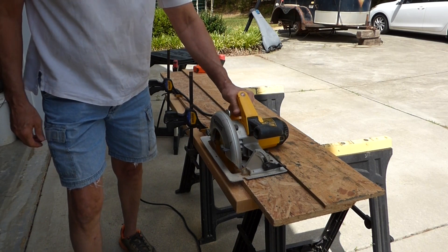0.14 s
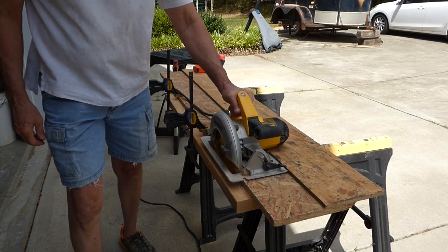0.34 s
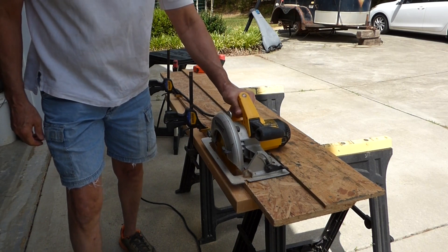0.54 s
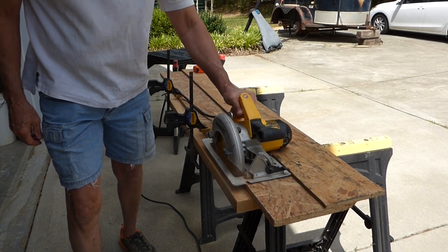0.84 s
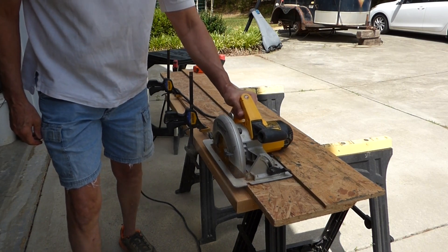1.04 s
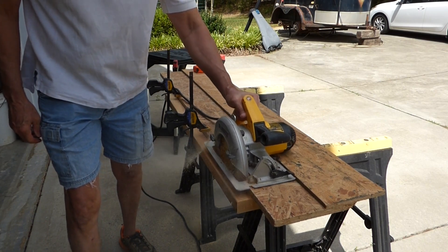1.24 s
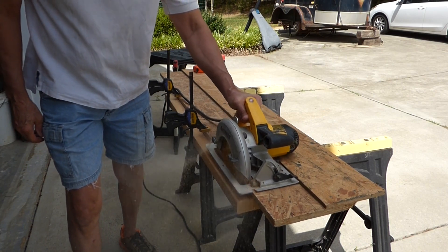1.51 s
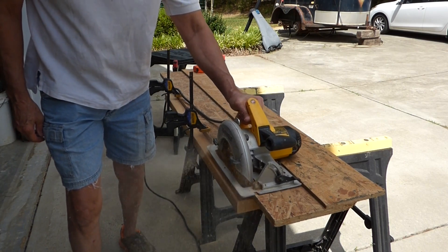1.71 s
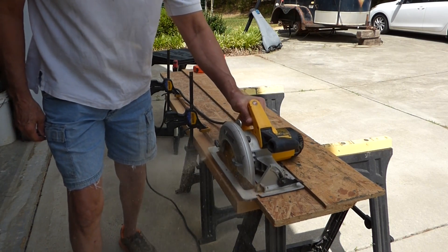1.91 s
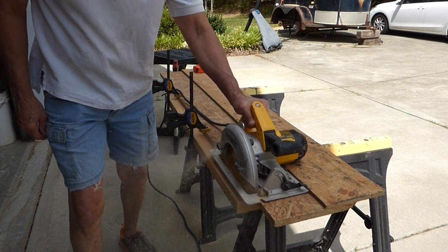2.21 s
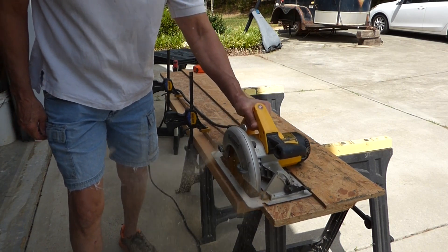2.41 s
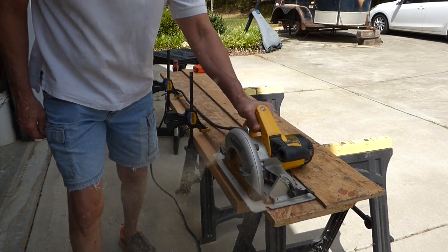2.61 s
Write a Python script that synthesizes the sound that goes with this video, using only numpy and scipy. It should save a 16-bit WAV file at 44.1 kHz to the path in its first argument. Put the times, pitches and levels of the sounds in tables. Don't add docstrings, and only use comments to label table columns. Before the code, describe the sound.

Circular saw kicks on with a sharp, dense clatter that dies quickly, then runs much quieter and steadily, gritty and hissing, its blade singing faintly in the wood; slight garage echo, quiet yard behind, near microphone.

```python
import sys
import numpy as np
from scipy import signal
from scipy.fft import rfft, irfft
from scipy.io import wavfile
from scipy.ndimage import uniform_filter1d

SR = 44100
rng = np.random.default_rng(int(sys.argv[2]) if len(sys.argv) > 2 else 0)


def rack_gain(trim_db):
    fader = np.asarray(trim_db, float)
    return 10 ** (fader / 20)


def store_pcm(level_fs):
    pcm = np.round(np.clip(level_fs, -1, 1) * 32767).astype(np.int16)
    wavfile.write(sys.argv[1], SR, np.atleast_2d(pcm).T)


N = 121275
TIME = np.arange(N) / SR
SWITCH_S, SPIN_UP_S = 0.1115, 0.009
MAINS_HUM_HZ = 120
AIR_TOP_DB = -20.3


def unit_level(x):
    return x / np.sqrt(np.mean(x ** 2) + 1e-20)


def read_curve(points, hz):
    f, value = np.transpose(points)
    return np.interp(np.log(hz + 1), np.log(f + 1), value)


def drift(seconds, count):
    span = max(int(seconds * SR / 64), 2)
    steps = rng.standard_normal((count, N // 64 + 2))
    steps = uniform_filter1d(uniform_filter1d(steps, span), span)
    return np.array([np.interp(np.arange(N) / 64, np.arange(len(s)), unit_level(s)) for s in steps])


def ring(x, modes, wander_db):
    out = np.zeros(N)
    sway = rack_gain(wander_db * drift(0.059, count=len(modes)))
    for k, (hz, width, db) in enumerate(modes):
        b, a = signal.iirpeak(hz, hz / width, SR)
        out += (-1) ** k * rack_gain(db) * signal.lfilter(b, a, x * sway[k])
    return out


def wash(shape, patch_db, flicker_db, likeness):
    frames, hz = N // 128 + 5, np.fft.rfftfreq(512, 1 / SR)
    a, b, c, d, patches = rng.standard_normal((frames, 257, 5)).T
    patches = uniform_filter1d(uniform_filter1d(patches, size=6, axis=0), size=18, axis=1)
    flicker = unit_level(uniform_filter1d(rng.standard_normal(frames), size=5))
    same = np.clip(likeness(hz), -1, 1)[:, None]
    left = a + 1j * b
    right = same * left + np.sqrt(1 - same ** 2) * (c + 1j * d)
    level_db = read_curve(shape, hz)[:, None] + patch_db * unit_level(patches) + flicker_db * flicker
    spectra = np.array([left, right]) * rack_gain(level_db)
    return unit_level(signal.istft(spectra, nperseg=512, noverlap=384)[1][:, :N])


# (time [s], housing shake [dB], air rush [dB], tooth bite [dB])
RUNNING = [(0.128, -18, -32, -37), (0.159, -31, -14, -27), (0.17, -28, -20, -26.5), (0.33, -35, -21, -33),
           (0.43, -31.5, -21.5, -27.5), (0.46, -34.5, -21.5, -33), (0.63, -31.5, -10, -29.5),
           (0.7, -34, -20, -37), (0.76, -34.5, -19.5, -30), (1.23, -36, -8, -33), (1.35, -32, -20.5, -27),
           (1.41, -31.5, -22.5, -33), (1.49, -35.5, -18.5, -31), (1.71, -32, -21, -30.5),
           (2.02, -38, -21.5, -32), (2.04, -35, -21, -32), (2.49, -37.5, -21, -35),
           (2.75, -36.5, -21.5, -28.5)]


def running_db(column):
    rows = np.array(RUNNING)
    return np.interp(TIME, rows[:, 0], rows[:, column])


def switched_on():
    return np.clip((TIME - SWITCH_S) / SPIN_UP_S, 0, 1) ** 2


def chatter():
    spread_db = 1.5 * np.minimum(rng.exponential(1, N), 4)
    size = rack_gain(spread_db) * rng.choice([-1., 1.], N)
    ripple = 1 + 0.22 * np.sin(2 * np.pi * MAINS_HUM_HZ * TIME)
    hits = rng.random(N) < 2500 / SR
    return unit_level(ripple * size * hits)


# (frequency [Hz], width [Hz], level [dB])
BODY_MODES = [(231, 18, -21), (369, 22, -13.5), (490, 25, -9), (656, 63, -16.5), (823.4, 35.4, -4.5),
              (968, 39, -3), (1057, 40, -4), (1170, 47, -3), (1253, 38, -2), (1436, 73, -8),
              (1545, 48, -0.5), (1900, 420, -9)]
# (frequency [Hz], width [Hz], level [dB])
KERF_MODES = [(2090, 45, -5.5), (2300, 55, 0), (2380, 70, -2), (2462, 55, .5), (2540, 45, 0),
              (2650, 150, -8), (2870, 18, -6)]
# (frequency [Hz], width [Hz], level [dB])
BLADE_MODES = [(3080, 18, -5), (4073, 83, -4), (4690, 184, -3.5), (5246, 150, -3.5), (5975, 74, -1),
               (7930, 580, -1.5), (8860, 170, 1), (9740, 420, -6), (10530, 90, -11), (10300, 71, 1),
               (12200, 1700, -7), (13340, 310, -6.5)]
# (frequency [Hz], width [Hz], level [dB])
PLATE_MODES = [(3185, 14, -2), (3307, 16, 0), (3470, 14, -1), (3640, 16, 1), (3852, 16, 0), (4143, 30, 1),
               (4851, 30, 3), (1394, 14, -1)]


def gears():
    since = TIME - SWITCH_S
    spun = 1 - np.exp(-np.clip(since, 0, 9) / 0.0084)
    judder_db = 4 * np.exp(-(since / 0.11 - 1) ** 2)
    blade_db = np.minimum(running_db(column=2), AIR_TOP_DB) - 5
    body = unit_level(ring(chatter(), BODY_MODES, 1.5)) * rack_gain(running_db(column=1) + judder_db)
    kerf = unit_level(ring(chatter(), KERF_MODES, 0.57)) * rack_gain(running_db(column=3) - 2.0)
    blade = unit_level(ring(chatter(), BLADE_MODES, 1.06)) * rack_gain(blade_db) * spun
    plate = unit_level(ring(chatter(), PLATE_MODES, 1.5)) * rack_gain(-40.5)
    return switched_on() * (body + kerf + blade + plate)


# (time [s], level [dB], brightness [0-1])
KNOCKS = [(.1132, -18, .9), (.1146, -11, .7), (.1156, -7, .65), (.1164, -7, .55), (.1177, -3, .5),
          (.1186, -4, .5), (.1198, -6, .45), (.1220, -7, .25), (.1243, -4, .15), (.1263, -8, .6),
          (.1280, -8, .45), (.1320, -5, .3), (.1340, -6, .35), (.1358, -7, .3), (.1390, -10, .35),
          (.1415, -7, .35), (.1430, -9, .35), (.1470, -14, .4), (.1526, -10, .4), (.1548, -11, .3),
          (.1660, -13, .3), (.1780, -13, .3), (.197, -13, .25), (.2150, -14, .2)]
# (frequency [Hz], width [Hz], level [dB])
KNOCKED_MODES = [(130, 91, -27), (237, 21, -7), (525, 135, -4.5), (833, 49, -0.5), (1060, 48, 0.5),
                 (1330, 290, -31), (1537, 210, -3), (1780, 240, 0), (2187, 120, 2.5), (3030, 600, 3)]
# (frequency [Hz], width [Hz], level [dB])
CRACKED_MODES = [(3100, 800, -1), (4400, 1200, 0), (6000, 1100, -1.5), (8600, 2200, -2), (11500, 2500, -6)]


def knocks():
    grit = rng.standard_normal(N)
    dull, bright = np.zeros(N), np.zeros(N)
    for start, db, brightness in KNOCKS:
        since = np.clip(TIME - start, 0, 1)
        u, v = since / 0.00052, since / 0.000099
        scrape = u * np.exp(1 - u) * grit
        snap = 1.17 * v * np.exp(1 - v)
        blow = rack_gain(db) * (scrape + snap)
        dull += (1 - brightness) * blow
        bright += brightness * blow
    thud = rack_gain(3.5) * ring(dull, KNOCKED_MODES, 0)
    crack = rack_gain(3.5) * ring(bright, CRACKED_MODES, 0)
    return thud + crack


# (frequency [Hz], level [dB per Hz])
RUSH_COLOUR = [(180, -60), (300, -27), (478, -9), (713, -23.5), (2360, -12), (3130, -15.5), (6620, -8),
               (9710, 3), (16000, -17)]
# (frequency [Hz], likeness [0-1])
RUSH_LIKENESS = [(100, .93), (500, .88), (2000, .92), (4000, .84), (8000, .95), (11000, .97), (15000, .76)]


def air():
    rush = wash(RUSH_COLOUR, 1, 0.96, lambda hz: read_curve(RUSH_LIKENESS, hz))
    rush_db = np.minimum(running_db(column=2), AIR_TOP_DB) - 0.5
    return switched_on() * rack_gain(rush_db) * rush


# (start [s], length [s], frequency [Hz])
SINGS = [(1.64, .16, 1243), (2.35, .42, 1295), (1.24, .16, 960), (2.64, .14, 2310), (1.1, .12, 1400),
         (.33, .13, 832), (.24, .09, 1550), (.95, .2, 3080), (1.1, .25, 2090), (1.5, .2, 6060),
         (1.75, .15, 1550), (.36, .09, 2470), (.86, .1, 2330), (.11, .15, 836), (.53, .12, 834),
         (.122, .07, 1040), (.122, .035, 1560), (.195, .035, 1865), (.25, .035, 2400), (.57, .09, 2520),
         (1.5, .14, 2540), (1.43, .1, 2320), (.8, .3, 965), (1.5, .5, 500), (2.3, .2, 2295),
         (.7, .25, 2460)]
SINGS_DB = [-33, -40, -38, -35, -39, -36, -34, -43, -43, -42, -41, -35, -36, -32.5, -41, -26, -24, -30, -31,
            -36, -40, -38, -45, -50, -42, -40]


def singing():
    out = np.zeros(N)
    waver = drift(0.016, count=len(SINGS))
    for (start, length, hz), db, w in zip(SINGS, SINGS_DB, waver):
        swell = np.sin(np.pi * np.clip((TIME - start) / length, 0, 1))
        phase = 2 * np.pi * np.cumsum(hz + 5.7 * w) / SR
        out += rack_gain(db + 1) * swell * np.sin(phase)
    return out


# (multiple of the hum [count], level [dB])
HUM_OVERTONES = [(1, -2.5), (2, -8.5), (3, -3.5)]
# (time [s], level [dB])
LOAD = [
    (0, -65),
    (.3, -68),
    (.6, -73),
    (1.17, -73),
    (1.3, -63),
    (1.47, -59),
    (1.7, -68),
    (2.2, -70),
    (2.7, -66.5),
]


def windings():
    sway = rack_gain(1.2 * drift(0.034, count=len(HUM_OVERTONES)))
    hum = np.zeros(N)
    for (multiple, db), g in zip(HUM_OVERTONES, sway):
        hum += rack_gain(db) * g * np.sin(2 * np.pi * multiple * (MAINS_HUM_HZ * TIME + 0.03))
    load_db = np.interp(TIME, *np.transpose(LOAD))
    return rack_gain(6.5 + load_db) * hum


# (frequency [Hz], time to fall by 60 dB [s])
GARAGE_RING = [(300, 0.076), (1000, 0.86), (3000, 0.32), (10000, 0.022)]


def garage(x):
    taps = np.zeros((2, SR // 2))
    at = np.arange(300, SR // 2 - 20, 20) + rng.integers(0, 20, (2, (SR // 2 - 301) // 20))
    np.put_along_axis(taps, at, rng.choice([-1., 1.], at.shape), 1)
    hz, t, z = signal.stft(taps, SR, nperseg=256)
    fade = rack_gain(-60 * t / read_curve(GARAGE_RING, hz)[:, None])
    tail = signal.istft(z * fade, SR, nperseg=256)[1]
    return signal.fftconvolve(x[None], tail / np.linalg.norm(tail[0]), axes=1)[:, :N]


# (frequency [Hz], level [dB per Hz])
YARD_COLOUR = [(15, -34), (60, -27), (119, -7.5), (286, -11.5), (382, -12.5), (1160, -10), (6670, -20.5),
               (12000, -28.5), (16000, -44)]


def yard():
    return rack_gain(-51.5) * wash(YARD_COLOUR, 0.56, 0.28, lambda hz: 0.67 + 0 * hz)


# (frequency [Hz], left minus right [dB])
LEAN = [(60, -.5), (150, -1.4), (300, -1.2), (500, .9), (1000, .4), (2000, 1.2), (4000, .9), (8000, 1.1),
        (15000, 1.7)]


def scene():
    saw = gears() + knocks() + windings() + singing()
    both = saw + air() + rack_gain(-17.5) * garage(saw)
    both = signal.lfilter(*signal.iirnotch(391, 391 / 83, SR), both)
    lean_db = read_curve(LEAN, np.fft.rfftfreq(N, 1 / SR)) / 2
    return irfft(rfft(both) * rack_gain([lean_db, -lean_db]), N) + yard()


def low_pass(x):
    return signal.sosfilt(signal.butter(12, 16050, fs=SR, output="sos"), x)


def record(dry):
    thin = signal.sosfilt(signal.butter(1, 71.4, "high", fs=SR, output="sos"), dry)
    held = 1.2 * np.tanh(thin / 1.2)
    top_edge = signal.firwin(2047, 15720, window=("kaiser", 9), fs=SR)
    edged = signal.oaconvolve(held, top_edge[None], "same")
    return low_pass(edged)


dry = scene()
out = record(dry)
store_pcm(out)
```